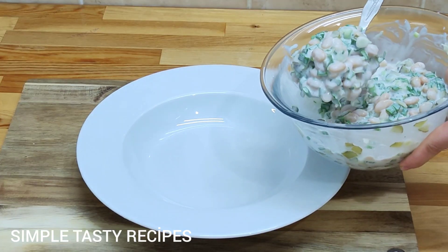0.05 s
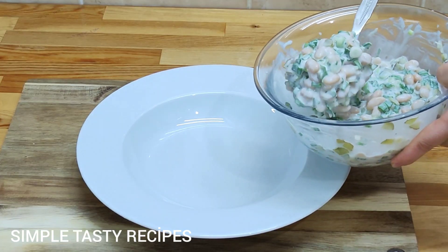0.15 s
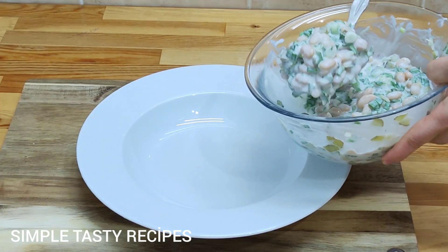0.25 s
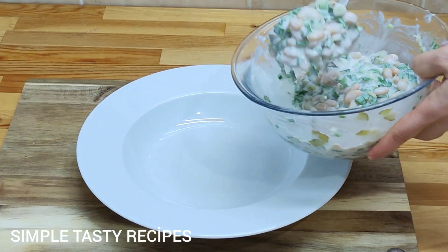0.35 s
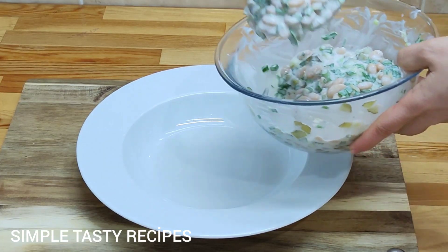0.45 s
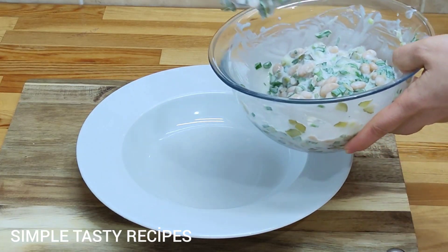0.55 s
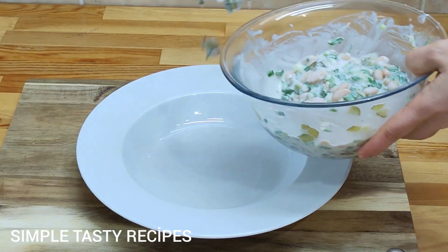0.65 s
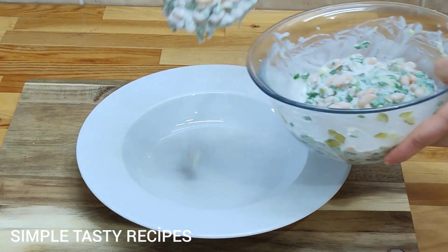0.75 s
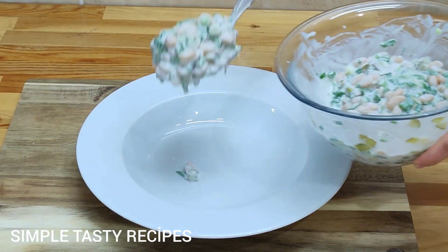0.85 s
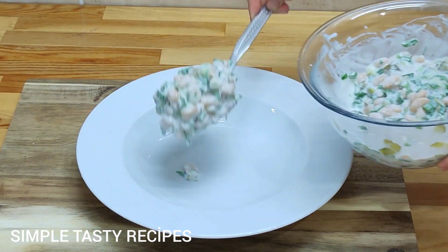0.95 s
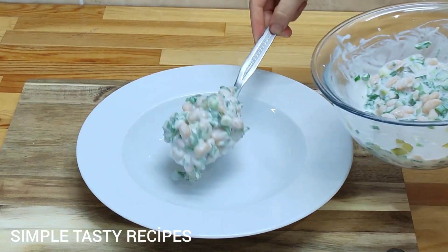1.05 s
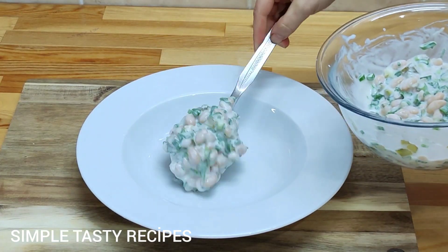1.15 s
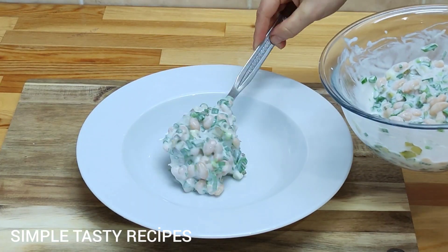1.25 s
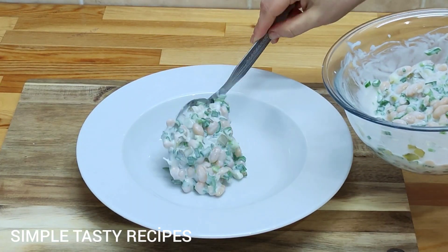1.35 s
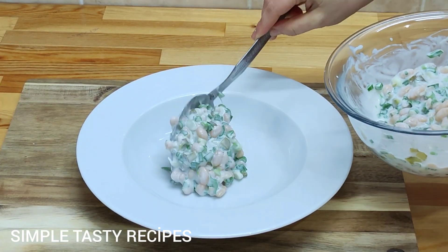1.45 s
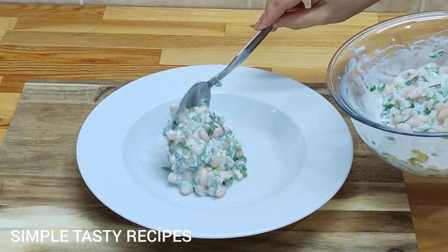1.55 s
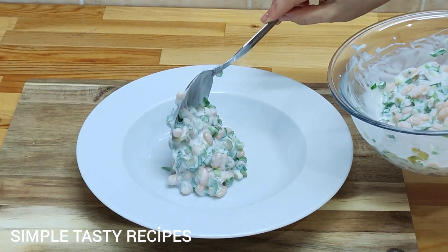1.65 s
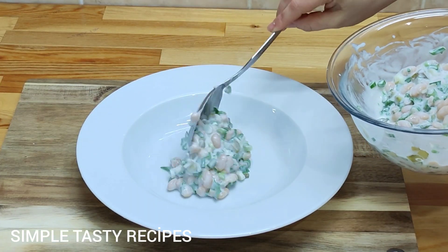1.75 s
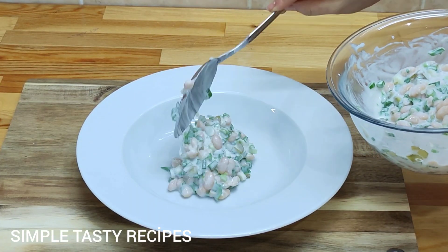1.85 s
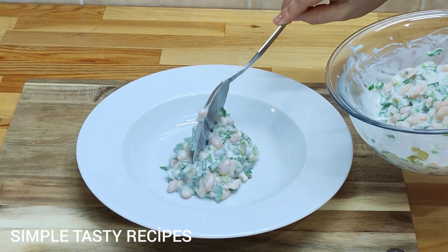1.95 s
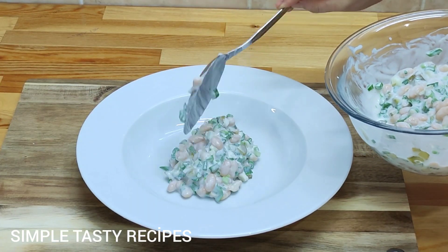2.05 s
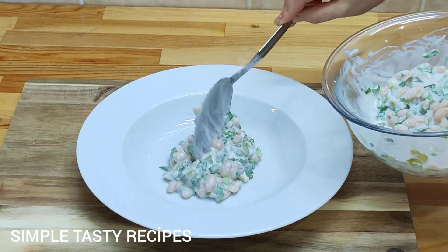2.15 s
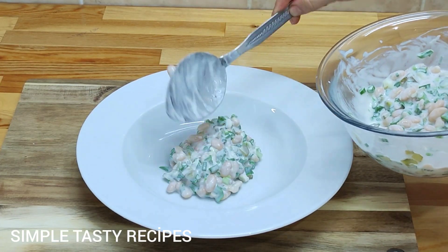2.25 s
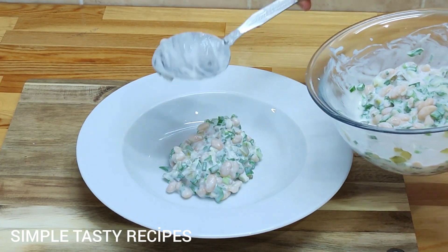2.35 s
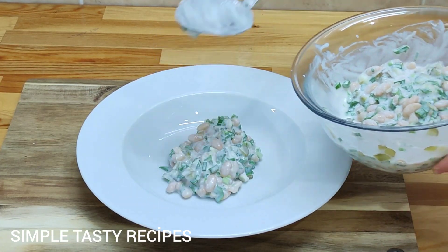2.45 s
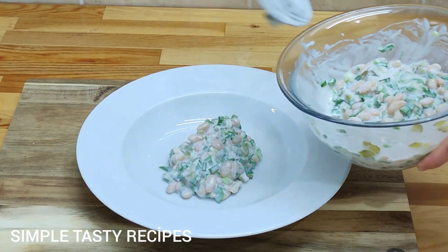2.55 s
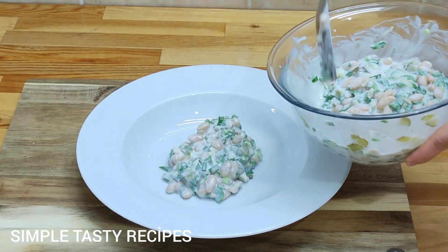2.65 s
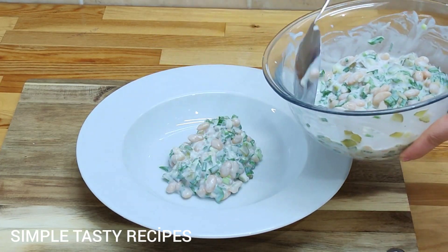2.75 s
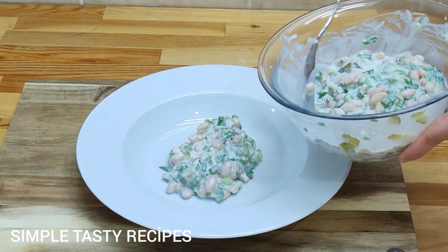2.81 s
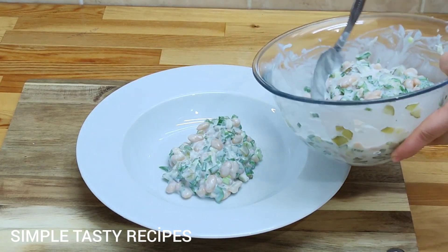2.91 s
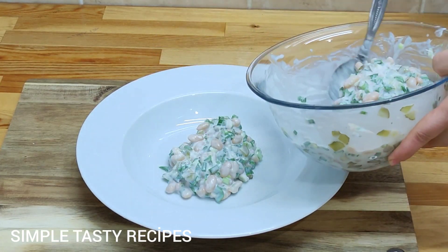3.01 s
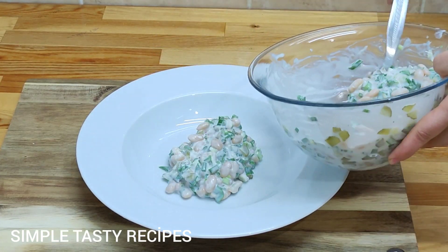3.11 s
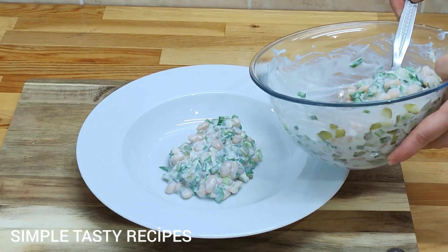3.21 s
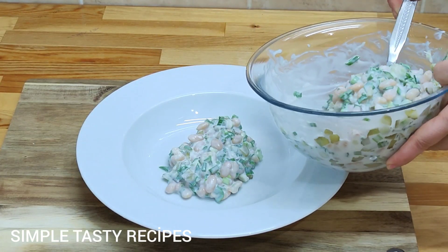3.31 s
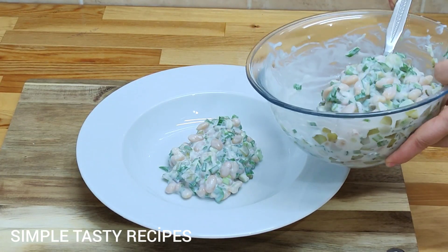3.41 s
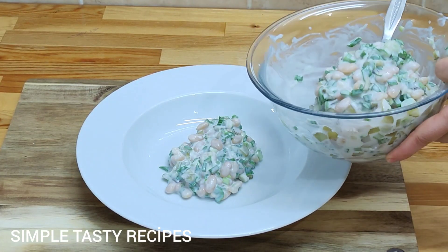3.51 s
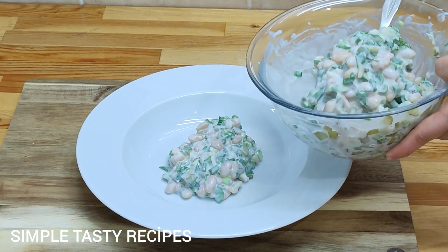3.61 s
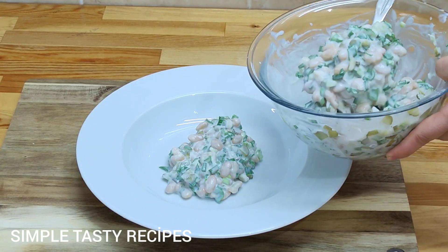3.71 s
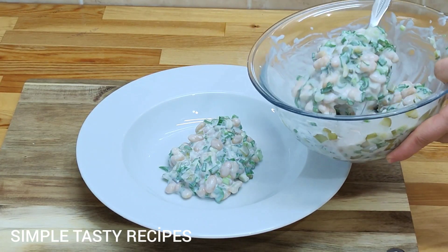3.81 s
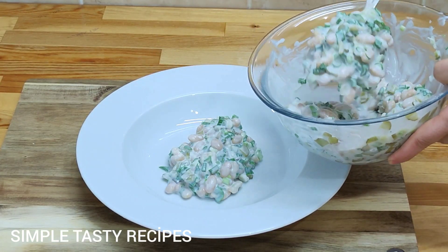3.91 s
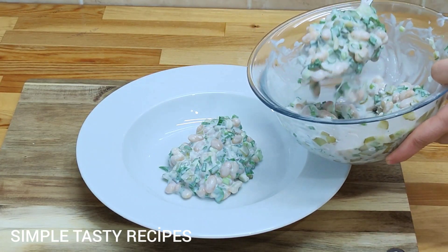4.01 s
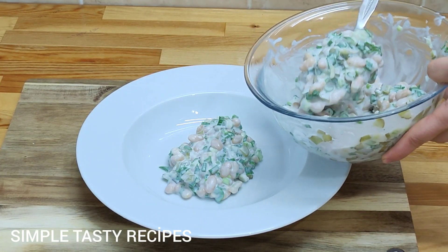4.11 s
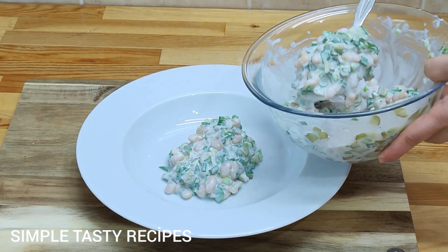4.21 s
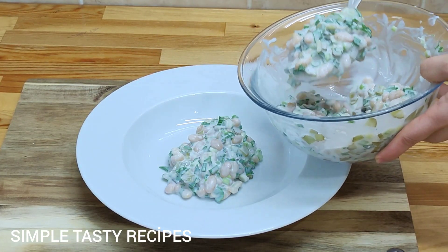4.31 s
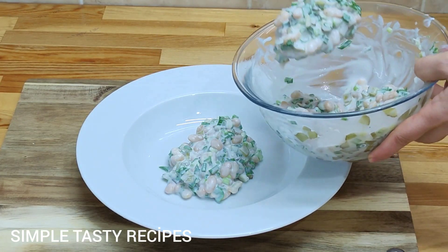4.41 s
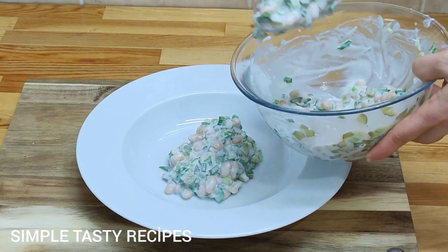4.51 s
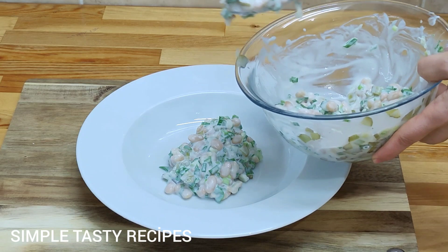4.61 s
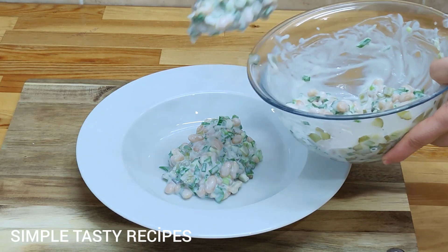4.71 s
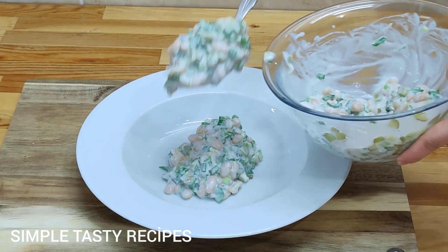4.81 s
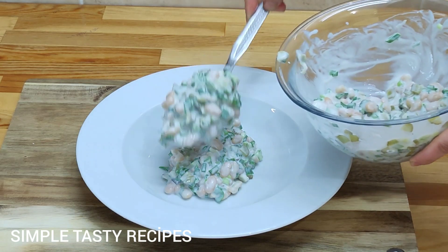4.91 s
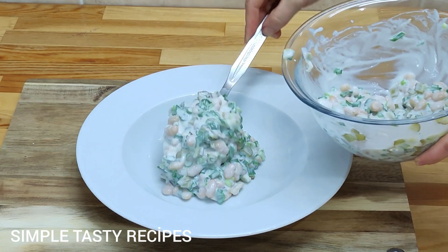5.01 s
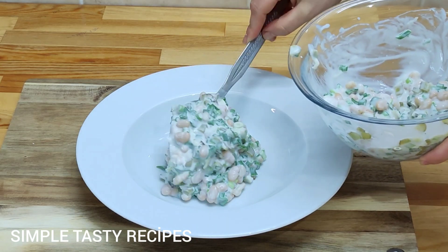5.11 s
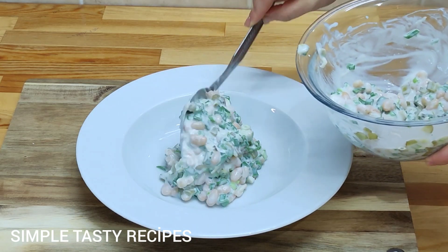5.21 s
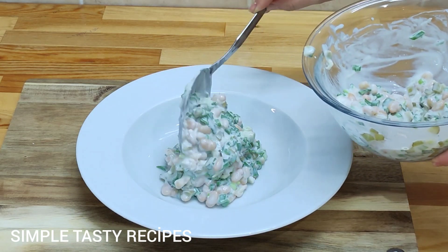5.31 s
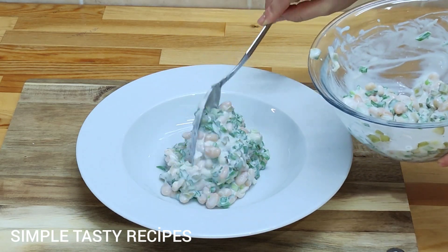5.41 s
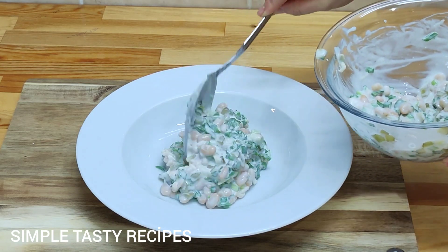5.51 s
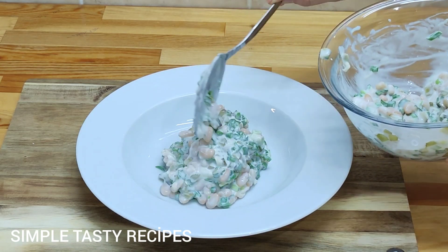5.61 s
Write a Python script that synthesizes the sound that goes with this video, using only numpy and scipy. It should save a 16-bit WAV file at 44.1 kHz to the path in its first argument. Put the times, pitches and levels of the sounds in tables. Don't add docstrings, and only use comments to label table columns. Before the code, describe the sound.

In a small hard-walled kitchen, a spoon taps a glass bowl, then lightly touches a plate as wet salad drops. After a quiet gap comes a double clink, the second the loudest and most ringing, then a wet scrape, two duller bowl knocks and a last soft, wet landing. Close stereo microphones catch short bright echoes, faint hiss and a low fridge hum.

```python
import sys
import numpy as np
from scipy import signal
from scipy.fft import rfft, irfft
from scipy.io import wavfile
from scipy.ndimage import uniform_filter1d

SR = 44100
rng = np.random.default_rng(int(sys.argv[2]) if len(sys.argv) > 2 else 0)


def voltage_ratio(decibels):
    exponent = np.asarray(decibels, float) / 20
    return 10 ** exponent


def generate_wav(sig):
    pcm = np.round(np.clip(np.atleast_2d(sig).T, -1, 1) * 32767).astype(np.int16)
    wavfile.write(sys.argv[1], SR, pcm)


N = 249606

# mode in Hz, level in dB, t60 in s.
WALL_MODES = [(1654, -11, 0.059), (1710, -5.5, 0.15), (3120, -2, 0.23), (4850, -8.5, 0.16),
              (10500, -24, 0.086), (13600, -31, 0.22)]


def evened(x):
    return x / np.sqrt(np.mean(x ** 2) + 1e-20)


def read(points, hz):
    f, value = np.transpose(points)
    return np.interp(np.log(hz + 1), np.log(f + 1), value)


def add(mix, s, sound):
    part = mix[:, round(s * SR):][:, :sound.shape[1]]
    part += sound[:, :part.shape[1]]


def fuzzy(hz, width_hz, size):
    r = np.exp(-np.pi * width_hz / SR)
    settle = SR // 4
    slow = rng.standard_normal(size + settle) + 1j * rng.standard_normal(size + settle)
    slow = signal.lfilter([1], [1, -2 * r, r * r], slow)[settle:]
    carrier = np.exp(2j * np.pi * hz * np.arange(size) / SR)
    return evened((slow * carrier).real)


def kitchen(count):
    # frequency in Hz, t60 in s.
    decay = [(300, .5), (1060, 0.35), (2790, 0.35), (7350, 0.27), (14000, 0.25)]
    size = SR * 3 // 4
    taps = np.zeros((count, 2, size))
    slots = np.arange(130, size - 16, 16)
    at = slots + rng.integers(0, 16, (count, 2, len(slots)))
    np.put_along_axis(taps, at, rng.choice([-1., 1.], at.shape), 2)
    hz, t, z = signal.stft(taps, SR, nperseg=256)
    fall_db = -60 * t / read(decay, hz)[:, None]
    fade = voltage_ratio(fall_db) + voltage_ratio(-16.0 + 0.66 * fall_db)
    tail = signal.istft(z * fade, SR, nperseg=256)[1]
    return tail / np.linalg.norm(tail, axis=2, keepdims=True)


def in_room(direct, tail, room_db):
    wet = signal.fftconvolve(direct.mean(0)[None], tail, axes=1)
    extra = wet.shape[1] - direct.shape[1]
    return voltage_ratio(room_db) * wet + np.pad(direct, ((0, 0), (0, extra)))


def ring(modes, t, spread):
    hz, db, t60 = np.transpose(modes)[:, :, None]
    lag = np.minimum(spread * hz / 3000, 2.5) * rng.uniform(-1.0, 1, hz.shape)
    fade = voltage_ratio(db - 60 * t / t60) * np.minimum(t / 0.00028, 1)
    return np.array([(fade * np.sin(2 * np.pi * hz * t + side * lag)).sum(0) for side in (-.5, .5)])


def crack(colour, t, t60):
    hz = np.fft.rfftfreq(len(t), 1 / SR)
    mid, side = rfft(rng.standard_normal((2, len(t)))) * voltage_ratio(read(colour, hz))
    side = side * np.minimum(0.19 + hz / 6000, 1.1)
    noise = irfft(np.array([mid + side, mid - side]), len(t))
    return evened(noise) * voltage_ratio(-60 * t / t60) * np.minimum(t / .0007, 1)


def colour_of(modes, broad, broad_db, ripple_db, over_counter):
    # centre in Hz, half width in Hz, depth in dB.
    dips = [(4640, 110, -14.5), (6360, 300, -11.5), (13400, 240, -8)]
    peak_share, peak_db = 0.12, -9
    hz = np.geomspace(100, 16000, num=400)
    mode_hz, db, _ = np.transpose(modes)[:, :, None]
    peaks = voltage_ratio(2 * (db - db.max() + peak_db)) / (1 + ((hz - mode_hz) / (peak_share * mode_hz)) ** 4)
    power = peaks.sum(0) + voltage_ratio(2 * (read(broad, hz) + broad_db))
    dips_db = sum(depth_db * np.exp(-((hz - dip_hz) / width_hz) ** 2) for dip_hz, width_hz, depth_db in dips)
    uneven_db = dips_db * over_counter + ripple_db * np.minimum(hz / 4000, 1)
    return np.transpose([hz, uneven_db + 10 * np.log10(power)])


def fridge():
    # line in Hz, steady rms in dB, wavering rms in dB, waver width in Hz.
    lines = [(99, -80, -82, 4), (145.3, -85, -74, 7), (199.7, -60.3, -69, 6), (294.5, -66.5, -71, 8),
             (344.5, -78, -78, 5), (441, -86, -84, 4), (490, -81, -84, 4), (882, -92, -90, 6)]
    t = np.arange(N) / SR
    steady = sum(voltage_ratio(db) * np.sqrt(2) * np.sin(2 * np.pi * (hz * t + rng.random())) for hz, db, _, _ in lines)
    waver = sum(voltage_ratio(db) * fuzzy(hz, width_hz, N) for hz, _, db, width_hz in lines)
    return (steady + waver) * voltage_ratio([[.2], [-.2]])


def air():
    # frequency in Hz, density in dB per Hz.
    hiss = [(15, -31), (30, -15), (60, -21), (95, -6.5), (150, 2), (250, 0.5), (350, -3), (546, -10),
            (884, -15.5), (2000, -23.5), (5190, -33), (6300, -40.5), (8000, -39.5), (9500, -34.5),
            (14000, -30.5)]
    # frequency in Hz, likeness of the channels (0 to 1).
    likeness = [(25, 0.33), (60, 0.79), (150, 0.86), (300, 0.65), (700, 0.48), (2000, 0.037), (8000, 0.064)]
    level_db = -64
    frames, hz = N // 512 + 5, np.fft.rfftfreq(2048, 1 / SR)
    a, b, c, d, patches = rng.standard_normal((frames, 1025, 5)).T
    patches = evened(uniform_filter1d(uniform_filter1d(patches, 24, 0), 8, 1))
    same = np.clip(read(likeness, hz), -1, 1)[:, None]
    left = a + 1j * b
    right = same * left + np.sqrt(1 - same ** 2) * (c + 1j * d)
    z = np.array([left, right]) * voltage_ratio(read(hiss, hz)[:, None] + 1.5 * patches)
    return voltage_ratio(level_db) * evened(signal.istft(z, nperseg=2048, noverlap=1536)[1][:, :N])


def singing():
    # start in seconds, length in seconds, pitch in Hz, rms in dB.
    tones = [(.37, .22, 1735, -85), (.7, .15, 2100, -88), (.68, .15, 1050, -87), (1.25, .1, 1950, -89),
             (2.6, .2, 3000, -94), (5.25, .35, 1760, -90)]
    out = np.zeros((2, N))
    for s, length_s, hz, db in tones:
        size = round(length_s * SR)
        tone = fuzzy(hz, 40, size) * signal.windows.tukey(size, .6)
        add(out, s, np.ones((2, 1)) * voltage_ratio(db) * tone)
    return out


def drag():
    # time in seconds, level in dB.
    course = [(3.301, -78), (3.352, -90), (3.37, -79), (3.376, -74.5), (3.482, -68), (3.544, -82),
              (3.564, -74.5), (3.721, -84)]
    # frequency in Hz, density in dB per Hz.
    rustle_colour = [(290, -35), (500, -18), (522, -15), (646, 3.5), (835, -13.5), (1700, -25),
                     (2100, -24.5), (12300, -24.5), (15000, -38)]
    slips_per_s, pressed_t60_s = 500, 0.021
    out, t = np.zeros((2, N)), np.arange(SR // 20) / SR
    s, level_db = np.transpose(course)
    u = np.arange(s[0], s[-1], 1 / SR)
    slips = (rng.random(len(u)) < slips_per_s / SR) * voltage_ratio(3.6 * rng.exponential(1, len(u)))
    slips = slips * rng.choice([-1, 1], len(u))
    glass = ring(WALL_MODES, t, 1.5) * voltage_ratio(-60 * t / pressed_t60_s)
    rub = signal.fftconvolve(slips[None], glass, axes=1)[:, :len(u)]
    rustle = crack(rustle_colour, u - s[0], 100)
    add(out, s[0], (voltage_ratio(-10.0) * evened(rub) + voltage_ratio(-3) * rustle) * voltage_ratio(np.interp(u, s, level_db)))
    return out


def plops():
    # start in seconds, rms in dB, pitch in Hz, t60 in s.
    lumps = [(0.874, -58, 382, .11), (1.9893, -75, 1428, 0.052), (2.239, -69.5, 398, 0.23),
             (3.1424, -44.5, 1294, 0.034), (5.05, -60.5, 830, 0.098), (5.226, -55.5, 431, 0.24),
             (5.387, -69.5, 960, 0.11)]
    # start in seconds, rms in dB, pitch in Hz.
    pings = [(1.255, -77, 2860), (3.445, -75, 3190), (3.473, -69, 1700), (3.481, -72, 3870),
             (4.79, -79.5, 3110)]
    # start in seconds, rms in dB, centre in Hz, t60 in s.
    ticks = [(.04, -84.5, 6920, 0.69), (.0662, -69, 4770, 0.016), (1.2526, -62, 1130, 0.039),
             (1.368, -66, 3360, 0.037), (2.1977, -73, 10850, 0.079), (3.209, -75.5, 7480, .26),
             (3.3651, -74, 3300, 0.029), (4.14, -78, 9000, .1), (4.487, -68, 9000, .012),
             (4.788, -69, 6800, 0.0093), (5.0461, -59.5, 3370, 0.017), (5.06, -84, 9150, 0.2)]
    # start in seconds, rms in dB, centre in Hz, t60 in s.
    squelches = [(.0662, -71.5, 1100, 0.23), (3.19, -66, 1100, 0.43), (3.5, -71, 644, 0.34),
                 (5.213, -64.5, 904, 0.26), (5.25, -69, 996, .06)]
    out, t = np.zeros((2, N)), np.arange(SR // 4) / SR
    # (t60 s,) sharpness (pitch over width), puff dB
    rows = [(*row, 5.5, -22) for row in lumps]
    rows += [(*row, 0.11, 22, -2) for row in pings]
    rows += [(*row, 2.4, -7.5) for row in ticks]
    rows += [(*row, 1, -16) for row in squelches]
    for s, db, hz, t60, sharp, puff_db in rows:
        puff = voltage_ratio(puff_db - 60 * t / 0.017) * rng.standard_normal((2, len(t)))
        body = voltage_ratio(-60 * t / t60) * fuzzy(hz, hz / sharp, len(t))
        add(out, s, voltage_ratio(db) * (body + puff) * np.minimum(t / 0.0015, 1))
    return out


def salad():
    return in_room(plops() + drag() + singing(), kitchen(count=1)[0], 0.43)[:, :N]


def spoon():
    # start in seconds, crack in dB, ring in dB, broad part in dB, left over right in dB.
    knocks = [
        (0.2143, -41.5, -49.5, 8, -0.5),
        (0.8494, -43.5, -51, 3, 2),
        (1.3921, -52.5, -67.5, -16.5, -1.5),
        (2.8366, -30.5, -44.5, 0, 3.3),
        (2.9127, -24, -20, -2.5, -0.8),
        (3.108, -47.5, -53.5, -3.5, 3),
        (3.8338, -40, -52.5, 3, 1),
        (4.1973, -32.5, -42.5, 4, 2),
    ]
    # pitch in Hz, level in dB, t60 in s.
    bowl = [(734, -10.5, 0.052), (830, -6, 0.064), (960, -2.5, 0.06), (1203, -14.5, .12),
            (1400, -10, 0.039), (1450, -29, 0.059), (1679, -1, 0.13), (1632, -3.5, 0.15),
            (1940, -16.5, 0.042), (2570, -19, 0.033), (3154, -7, 0.48), (3440, -3.5, 0.054),
            (4850, -14.5, 0.17), (5300, -17.5, 0.087), (8180, -7, 0.047), (10100, -12, 0.15),
            (10630, -11, 0.17), (14200, -14.5, 0.18)]
    rim = [(241.1, -33.5, 0.099), (838, -24, .2), (1174, -18.5, .13), (1255, -15.5, 0.22),
           (1305, -12, 0.27), (1671, -2.5, 0.081), (1750, -11, 0.072), (1816, -11.5, .1), (2034, -16, 0.23),
           (1910, -22, 0.08), (2053, -25.5, 0.14), (2501, -16.5, 0.11), (3090, -0.5, 0.19),
           (3180, -9, 0.067), (3500, -10.5, 0.17), (3170, -16, .1), (3400, -13, 0.07), (4284, -22, 0.17),
           (5000, -24.5, 0.59), (6570, -31.5, 0.18), (7504, -25, 0.11), (7430, -20.5, 0.044),
           (8320, -29, 0.13), (9173, -19, 0.15), (10300, -30, 0.38), (10650, -17.5, 0.23),
           (11086, -21.5, 0.48), (12300, -31, 0.3), (12360, -25, .2), (14600, -18, .2)]
    edge = [(590, -5, 0.24), (1246, -10, 0.24), (1600, -4, 0.059), (2176, -5.5, 0.049), (2730, 3, 0.063),
            (3580, 3.5, 0.058), (5460, -2, 0.05), (7610, -9.5, .15), (8350, -8.5, .06), (10050, -1, 0.13),
            (12690, -5.5, 0.054)]
    base = [(692, -9, 0.16), (830, -2.5, .1), (1662, -4, 0.051), (1646, 3.5, 0.11), (1155, -15, 0.088),
            (1300, -24, 0.092), (3080, 0, 0.046), (4860, -2.5, 0.12), (8800, -10.5, 0.088),
            (10060, -5, 0.33), (11900, -18.5, .15), (13950, -4, 0.11)]
    plate = [(1080, -9, 0.055), (2430, -4.5, 0.22), (2870, -1, 0.1), (4546, -4.5, 0.17), (6800, -5, 0.057),
             (7600, -10, 0.082)]
    heap = [(1100, 2, 0.037), (2860, 4.5, 0.057), (4400, -8.5, .04), (5660, -11, .03)]
    # frequency in Hz, density in dB per Hz.
    bowl_broad = [(200, -39.5), (380, -19.5), (600, -6.5), (1400, -9.5), (2400, -21.5), (5400, -16.5),
                  (9500, -12.5), (14300, -15)]
    rim_broad = [(150, -24.5), (950, -26.5), (1500, -6.5), (2350, -11.5), (3300, -7), (4900, -15),
                 (5900, -27.5), (8500, -15)]
    edge_broad = [(200, -45.5), (440, -25.5), (800, -12.5), (2000, -6.5), (3500, -2.5), (7100, -13),
                  (10400, -11), (14300, -11)]
    plate_broad = [(300, -41), (650, 0), (1200, -11), (2000, -12), (3600, -19.5), (4600, -22), (6500, -18),
                   (12000, -12.5)]
    struck = [(WALL_MODES, bowl_broad), (plate, plate_broad), (heap, plate_broad), (edge, edge_broad),
              (rim, rim_broad), (WALL_MODES, rim_broad), (base, bowl_broad), (bowl, bowl_broad)]
    crack_t60_s, longer_per_db = .045, 0.072
    room_usual_db, room_rebound_db, rebound_s = -1.5, 9.5, .25
    out, t = np.zeros((2, N)), np.arange(SR // 2) / SR
    ripple_db = 4 * rng.standard_normal(size=400)
    grip = voltage_ratio(-60 * t / 0.32)
    last_s, last_db = -1, 0
    for row, (modes, broad), tail in zip(knocks, struck, kitchen(count=len(knocks))):
        s, crack_db, ring_db, broad_db, pan_db = row
        colour = colour_of(modes, broad, broad_db, ripple_db, broad is not plate_broad)
        rebound = s - last_s < rebound_s and crack_db < last_db
        room_db = room_rebound_db if rebound else room_usual_db
        last_s, last_db = s, crack_db
        t60 = crack_t60_s * np.exp(longer_per_db * (crack_db + 33))
        twins = ring(modes, t, 2.5) + 0.46 * ring(np.multiply(modes, [1.008, 1, .6]), t, 4.5)
        burst = crack(colour, t, t60)
        murmur = voltage_ratio(-7) * crack(colour, t, 0.18)
        hollow = voltage_ratio(-15 - 60 * t / 0.088) * fuzzy(637.6, 160, len(t)) * np.minimum(t / 0.0063, 1)
        hollow = (broad is bowl_broad) * hollow
        direct = voltage_ratio(crack_db) * (burst + murmur + hollow) + voltage_ratio(ring_db) * grip * twins
        add(out, s, in_room(direct * voltage_ratio([[pan_db / 2], [-pan_db / 2]]), tail, room_db))
        thud = voltage_ratio(-26.5 - 60 * t / 0.6) * fuzzy(275, 350, len(t)) * np.minimum(t / 0.0013, 1)
        add(out, s, voltage_ratio(crack_db) * np.array([thud, thud]))
    return out


def scene():
    high_pass = signal.butter(2, 170, "high", fs=SR, output="sos")
    return signal.sosfilt(high_pass, spoon() + salad()) + fridge() + air()


def starved(x, quiet_db, masked_db, cut_db):
    hz, _, z = signal.stft(np.array([x[0] + x[1], x[0] - x[1]]) / 2, SR, nperseg=1024)
    power = uniform_filter1d(abs(z) ** 2, size=3, axis=2) + 1e-20
    band = uniform_filter1d(power, size=5, axis=1)
    around = uniform_filter1d(power, size=60, axis=1)
    floor = np.maximum(voltage_ratio(2 * quiet_db), around * voltage_ratio(2 * masked_db))
    dropped = (band < floor) & (hz[:, None] > 2500)
    mid, side = signal.istft(z * np.where(dropped, voltage_ratio(cut_db), 1), SR, nperseg=1024)[1][:, :N]
    return np.array([mid + side, mid - side])


def roll_off(x):
    return signal.sosfilt(signal.butter(12, 15320, fs=SR, output="sos"), x)


def record(dry):
    edge_hz = 14330
    hz = np.fft.rfftfreq(N, 1 / SR)
    limit_db = np.interp(hz, edge_hz + np.array([-40, 60, 1000, 3000]), [0, -30, -46, -70])
    thinned = starved(dry, quiet_db=-118.5, masked_db=-10, cut_db=-16)
    return roll_off(irfft(rfft(thinned) * voltage_ratio(limit_db), N))


dry = scene()
out = record(dry)
generate_wav(out)
```